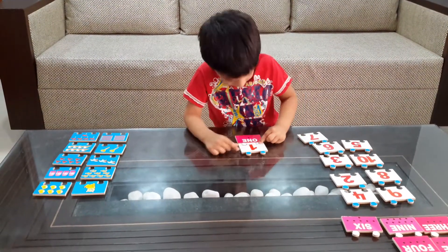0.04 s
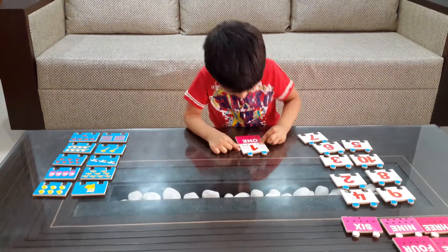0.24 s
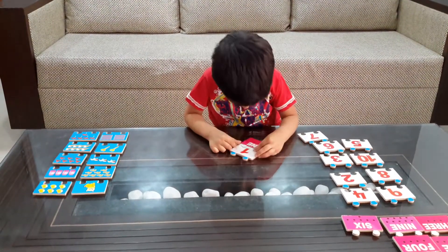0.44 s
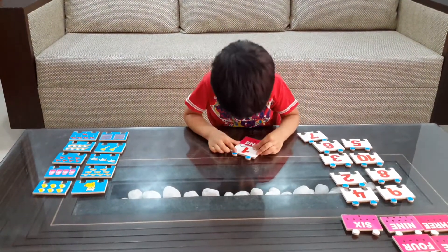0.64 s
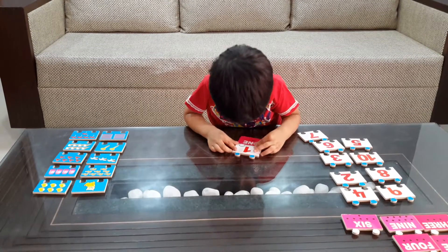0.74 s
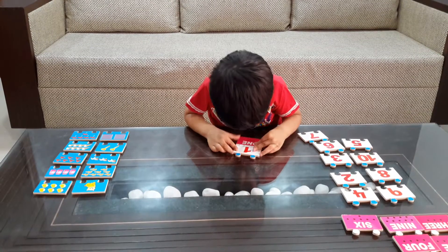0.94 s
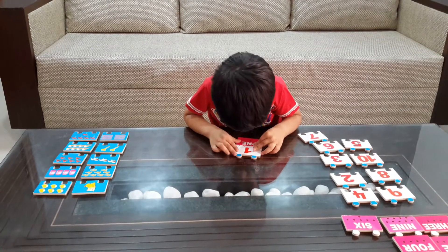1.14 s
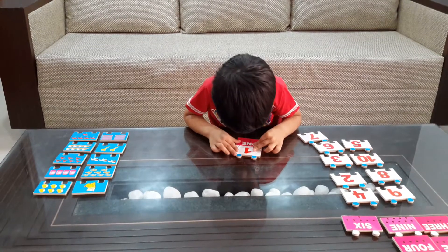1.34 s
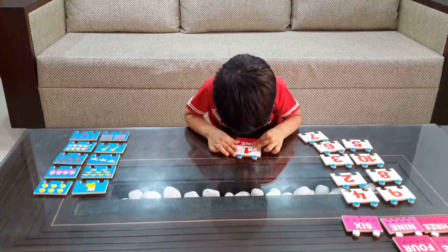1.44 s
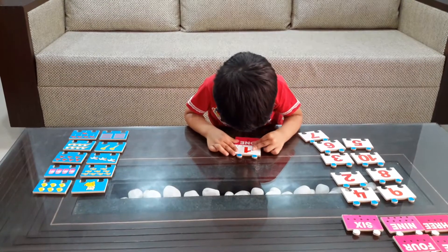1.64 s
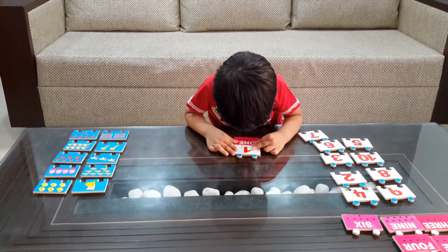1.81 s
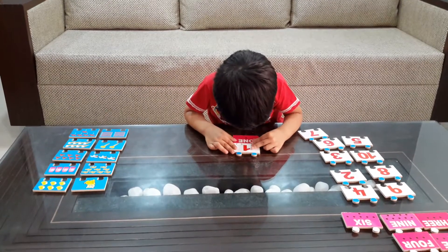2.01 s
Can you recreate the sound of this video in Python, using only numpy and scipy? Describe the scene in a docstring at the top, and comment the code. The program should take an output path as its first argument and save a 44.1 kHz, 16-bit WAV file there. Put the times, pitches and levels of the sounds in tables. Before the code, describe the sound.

Sharp clacks of small wooden puzzle pieces against each other and a glass table, then faint sliding

```python
"""In a bare, hard room, heard by a phone, wooden puzzle pieces clack together and onto a glass table.
Each knock is a shaped pulse (the crack) plus decaying modes: clack, ping, two pieces, table thud and hum.
Convolution with decaying noise gives echoes that build up and outlast the knock.
Later a piece creeps over the glass as pulsed grit with a few tiny ticks, and something rustles as a
swell of coloured noise, above the steady noise of the room's hush."""
import sys
import numpy as np
from scipy import signal
from scipy.fft import rfft, irfft
from scipy.io import wavfile
from scipy.ndimage import uniform_filter1d

SR = 44100
rng = np.random.default_rng(int(sys.argv[2]) if len(sys.argv) > 2 else 0)


def materialize(psi):
    """Save the field psi as 16-bit PCM at rate SR to the path in sys.argv[1].

    A 1-D psi becomes a single channel; in a 2-D psi each row is a channel.
    """
    bounded = np.clip(np.atleast_2d(psi).T, -1, 1)
    quanta = np.round(bounded * 32767).astype(np.int16)
    wavfile.write(sys.argv[1], SR, quanta)


N = 91419


def knocks():
    """Linear superposition: each blow excites pulse and modes, convolved with its own room response."""
    # Blows of wood on wood and glass: t/s, crack level/dB, crack tilt/(dB per octave),
    # clack level/dB, clack f/Hz, ping level/dB, ping f/Hz, first piece level/dB, second piece level/dB,
    # thud level/dB, thud hardness/(dB per octave), hum level/dB, hum f/Hz
    blows = [(-0.030, -16, 3.5, -36.5, 1966, -39, 3404, -22, -50, -38, -11, -58, 205),
             (0.170, -30.5, -2, -46.5, 1727, -60, 3400, -42.5, -57, -35, 2.5, -48.5, 384.8),
             (0.231, -25.5, -0.5, -43.5, 1943, -50, 6650, -31, -37, -43, -6, -39.5, 247),
             (0.451, -34.5, -1.5, -45, 2032, -59.5, 3830, -43, -42.5, -44.5, -10, -53.5, 252),
             (0.611, -44, 3, -70, 1980, -66, 8230, -57, -63, -58, -13, -55.5, 225),
             (0.684, -45.5, 0, -70, 1990, -65.5, 3490, -62, -47, -50, -7, -62, 230),
             (0.711, -28, -3.5, -40.5, 2150, -32.5, 8620, -34, -37, -36, 11.5, -46.5, 345),
             (0.724, -19, 2, -43.5, 1910, -48, 6940, -29.5, -29.5, -41.5, 7, -45.5, 595),
             (0.762, -16.5, 2.5, -50, 2270, -28.5, 8800, -53, -28.5, -38.5, -8.5, -47, 377),
             (0.815, -43, -6.5, -51.5, 2030, -42, 8895, -38.5, -55, -38, 0, -42, 235),
             (1.004, -28.5, 0.5, -46.5, 1826, -51, 8170, -33, -35, -48, -5, -54.5, 390),
             (1.045, -32.5, -2, -49, 2620, -56, 3416, -59, -47, -40, -7.5, -43.5, 225),
             (1.105, -42, 1, -64, 2640, -53, 8660, -48, -50, -58, -4, -58, 222)]
    # Modes of the first wooden piece: f/Hz, relative level/dB, t60/s
    first_modes = [(3399, -9, 0.035), (3435, -4.5, 0.046), (3830, -9.5, 0.035), (4930, -9, 0.03),
                   (6060, -18, 0.032), (6500, -8, 0.067), (7560, -1.5, .08), (7664, -2, 0.097),
                   (8330, 2, 0.075), (8670, -4, 0.15), (9300, -2, 0.0808), (9810, -1, .08)]
    # Modes of the second wooden piece: f/Hz, relative level/dB, t60/s
    second_modes = [(3500, -18.5, 0.0253), (4490, 2, 0.0317), (5430, -2, 0.073), (5850, 3, .07),
                    (6210, 2.5, 0.062), (6850, 9, 0.068), (7250, 9, 0.077), (8210, -10, .07),
                    (8780, -20, 0.049), (8550, -3, .08), (9000, 10, 0.033), (8760, 10, 0.058),
                    (10160, -8, 0.21)]
    # Modes of the table: f/Hz, relative level/dB, t60/s
    table_modes = [(162.3, -9, 0.18), (215.1, -2, 0.2), (243, 1.5, 0.24), (376.8, -3.5, .16),
                   (426.4, -8, 0.14), (482, 0, 0.017), (509.4, -7, 0.11), (582, -10, 0.095),
                   (615, -9, 0.12), (795, -17.5, 0.0814), (948, -30.5, .08)]
    lead = 4096  # samples of room ahead of t = 0, for the knock that starts before it
    detune = 0.008  # standard deviation of the mode shift by grip and contact, as a share of f
    clack_t60_s, clack_linger_t60_s = 0.026, 0.54
    ping_t60_s, hum_t60_s = 0.35, 0.63
    thud_push_s, ping_push_s, hum_push_s = 0.0049, 0.005, 0.015  # onset time constants
    # Gains of the sound heard straight, over the same sound sent into the echoes
    clack_near_db, thud_near_db, ping_near_db, hum_near_db = 26.5, 24.5, 35, 34
    low_cut_hz, high_cut_hz = 156.6, 11900

    out = np.zeros(N + lead + 65536)
    for (start_s, crack_db, tilt_db, clack_db, clack_hz, ping_db, ping_hz, first_db, second_db,
         thud_db, hard_db, hum_db, hum_hz) in blows:
        first, second = (
            ring([(hz * (1 + detune * rng.standard_normal()), db, t60) for hz, db, t60 in modes])
            for modes in (first_modes, second_modes))
        blow = undb(crack_db) * crack(tilt_db)
        blow += undb(clack_db) * ring([(clack_hz, 0, clack_t60_s)])
        blow += undb(first_db) * first + undb(second_db) * second
        # The thin high note of a piece, the table, and the note of the glass under the spot struck
        ping = undb(ping_db) * ring([(ping_hz, 0, ping_t60_s)], 0, ping_push_s)
        thud = undb(thud_db) * ring(table_modes, hard_db, thud_push_s)
        hum = undb(hum_db) * ring([(hum_hz, 0, hum_t60_s)], 0, hum_push_s)
        linger = ring([(clack_hz, 0, clack_linger_t60_s)], 0, ping_push_s)

        heard = signal.fftconvolve(blow + ping + thud + hum, echoes())
        straight = undb(thud_near_db) * thud + undb(ping_near_db) * ping + undb(hum_near_db) * hum
        straight += undb(clack_db + clack_near_db) * linger
        heard[:len(straight)] += straight
        i = int(start_s * SR) + lead
        out[i:i + len(heard)] += heard
    out = signal.sosfilt(signal.butter(10, high_cut_hz, fs=SR, output="sos"), out)
    out = signal.sosfilt(signal.butter(6, low_cut_hz, "high", fs=SR, output="sos"), out)
    return out[lead:lead + N]


def crack(tilt_db=0, size=16384):
    """Minimum phase: folding the cepstrum packs a given spectrum into a causal pulse of energy 1."""
    # Spectrum of the crack: f/Hz, relative level/dB
    crack_spectrum = [(180, -47), (300, -22.5), (600, -19.5), (700, -23.5), (1000, -20.5), (1360, -27.5),
                      (2090, -19), (2550, -19.5), (2880, -26.5), (3300, -18), (4000, -20.5), (4590, -22.5),
                      (5200, -22.5), (5650, -20), (6100, -15.5), (7600, -13), (8700, -1.5), (10000, -24),
                      (11300, -26), (11900, -31), (13000, -62)]
    pivot_hz = 8000  # the tilt turns about this frequency
    tilted = [(hz, db + tilt_db * np.log2(hz / pivot_hz)) for hz, db in crack_spectrum]
    spike = np.zeros(size)
    spike[0] = 1
    magnitude = np.abs(rfft(colour(spike, tilted)))
    cepstrum = irfft(np.log(magnitude + 1e-6))
    cepstrum[1:size // 2] *= 2
    cepstrum[size // 2 + 1:] = 0
    pulse = irfft(np.exp(rfft(cepstrum)))
    return pulse / np.sqrt(np.sum(pulse ** 2))


def ring(modes, tilt_db=0, push_s=1e-4, size=16384):
    """Modal superposition: damped sines of total energy 1; a harder blow tilts them towards the high modes."""
    t = np.arange(size) / SR
    x = np.zeros(size)
    for hz, db, t60 in modes:
        decay = np.exp(-np.log(1000) * t / t60)
        x += undb(db + tilt_db * np.log2(hz)) * np.sin(2 * np.pi * hz * t) * decay
    x *= 1 - np.exp(-t / push_s)
    return x / np.sqrt(np.sum(x ** 2))


def echoes(size=44100):
    """Statistical reverberation: uneven noise builds up, flutters between two walls and dies by band."""
    # Reverberation time of the room: f/Hz, t60/s
    band_t60 = [(200, 0.88), (600, 0.92), (2000, 0.81), (5000, 0.67), (9000, 0.45), (12000, 0.54)]
    lump_s, scatter_db = 0.0015, 0.5  # smoothing width and level spread of the unevenness
    flutter_s, build_up_s = 0.0104, 0.0094
    early_db, early_s = -7, 0.0031  # extra early part and its time constant
    t = np.arange(size) / SR
    lumps = unit(uniform_filter1d(rng.standard_normal(size), int(lump_s * SR)))
    noise = rng.standard_normal(size) * undb(scatter_db * lumps)
    noise = flutter(noise, int(flutter_s * SR))
    spectrum = rfft(unit(noise))
    log_f = np.log(np.arange(size // 2 + 1) * SR / size + 1)
    hz, t60 = np.array(band_t60).T
    out = np.zeros(size)
    # Overlapping triangular bands on a log frequency axis
    for weights, band_s in zip(np.eye(len(hz)), t60):
        band = irfft(spectrum * np.interp(log_f, np.log(hz), weights), size)
        out += band * np.exp(-np.log(1000) * t / band_s)
    return out * (1 - np.exp(-t / build_up_s) + undb(early_db) * np.exp(-t / early_s))


def flutter(x, lag):
    """Repeated reflection: four evenly spaced repeats, each weaker by the same factor."""
    gain = 0.21
    return sum(gain ** k * np.roll(x, k * lag) for k in range(5))


def slide():
    """Stick-slip friction: dense grit under a creeping piece, with single ticks where it catches."""
    # Level of the grit: t/s, level/dB
    grit_levels = [(1.3, -59), (1.356, -55), (1.372, -92), (1.382, -63), (1.69, -85), (1.766, -55),
                   (1.91, -55.5), (1.968, -61.5), (2.07, -48.5)]
    # Catches of the piece: t/s, peak level/dB
    tick_levels = [(1.274, -47), (1.282, -48), (1.346, -44), (1.458, -51), (1.483, -47), (1.714, -55),
                   (1.762, -50), (1.896, -48), (2.019, -50)]
    scatter_db, tilt_db, tick_s = -2, 14, 0.001  # grain spread; pulse tilt per octave; tick time constant
    t = np.arange(N) / SR
    times, levels = np.array(grit_levels).T
    grit = unit(rng.standard_normal(N) * undb(scatter_db * rng.exponential(size=N)))
    grit *= undb(np.interp(t, times, levels, left=-120))
    catches = sum(undb(peak_db) * np.exp(-np.abs(t - at) / tick_s) for at, peak_db in tick_levels)
    return signal.fftconvolve(grit + catches * rng.choice([-1, 1], N), crack(tilt_db))[:N]


def rustle():
    """Amplitude-modulated noise: a faint soft swish that rises fast and fades exponentially."""
    # Spectrum of the swish: f/Hz, relative level/dB
    swish_spectrum = [(600, -18), (850, 12.5), (1000, 7), (1200, 10), (1450, 4.5), (1700, -7), (2000, -11),
                      (3000, -27)]
    peak_s, rise_s, fade_s, level_db = 1.85, 0.02, 0.14, -60.5
    t = np.arange(N) / SR - peak_s
    shape = np.exp(-np.abs(t) / np.where(t < 0, rise_s, fade_s))
    return undb(level_db) * shape * unit(colour(rng.standard_normal(N), swish_spectrum))


def hush():
    """Stationary coloured noise: room air and microphone hiss."""
    # Spectrum of the hush: f/Hz, relative level/dB
    hush_spectrum = [(20, -10.5), (50, -19), (90, -2), (200, -7), (440, -6), (540, -15), (2000, -24.5),
                     (4300, -36), (5600, -50), (7100, -16), (8500, -6), (9700, -16.5), (10500, -24),
                     (11500, -24.5), (12300, -39), (13300, -51)]
    level_db = -54.5  # ahead of the phone's own level control
    return undb(level_db) * unit(colour(rng.standard_normal(N), hush_spectrum))


def undb(db):
    """Level law: amplitude ratio of a level in dB."""
    return 10 ** (np.asarray(db) / 20)


def unit(x):
    """Normalisation to an rms value of 1."""
    return x / np.sqrt(np.mean(x ** 2))


def colour(x, table):
    """Linear filtering: weight the spectrum by (f/Hz, level/dB) points joined on a log frequency axis."""
    hz, db = np.array(table).T
    f = np.arange(len(x) // 2 + 1) * SR / len(x)
    return irfft(rfft(x) * undb(np.interp(np.log(f + 1), np.log(hz), db)), len(x))


def scene():
    """Superposition of all sources; a faint delayed copy of opposite sign in each channel gives width."""
    side_db, side_lag = -56, 300  # lag in samples
    mid = knocks() + slide() + rustle() + hush()
    side = undb(side_db) * np.roll(mid, side_lag)
    return np.array([mid + side, mid - side])


def record(dry):
    """Downward expansion and band limiting: the phone turns quiet passages down and cuts the top."""
    window_s, threshold_db, width_db, depth_db = 0.038, -48, 1.2, 8
    top_hz = 13450
    power = uniform_filter1d(dry[0] ** 2, int(window_s * SR))
    loud_db = 10 * np.log10(power + 1e-12)
    above = np.clip((loud_db - threshold_db) / width_db, -30, 30)
    dry = dry * undb(-depth_db / (1 + np.exp(above)))
    return signal.sosfilt(signal.ellip(8, 0.2, 70, top_hz, fs=SR, output="sos"), dry)


dry = scene()
out = record(dry)
materialize(out)
```